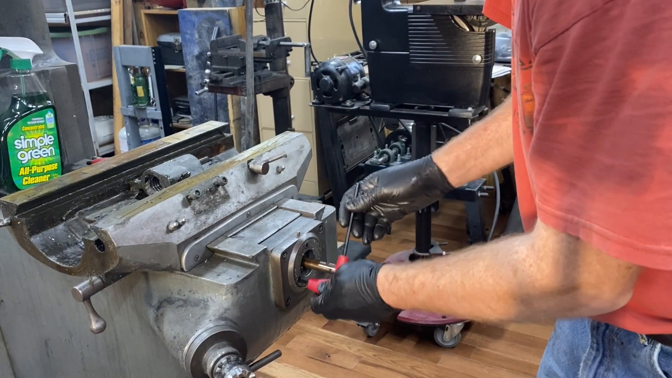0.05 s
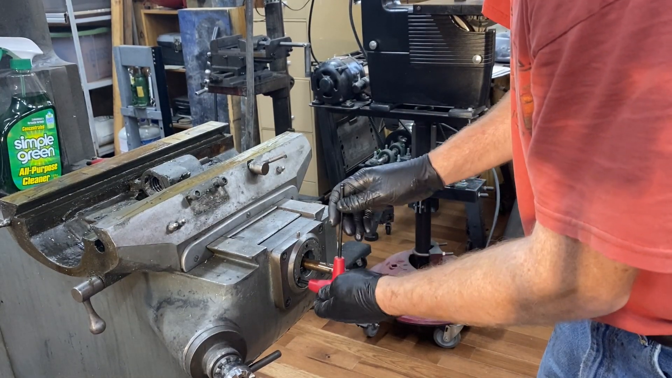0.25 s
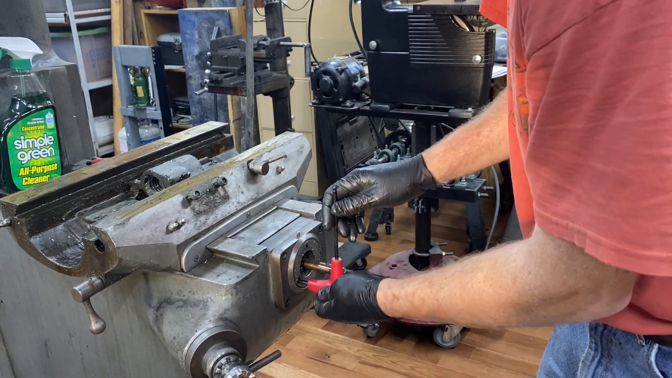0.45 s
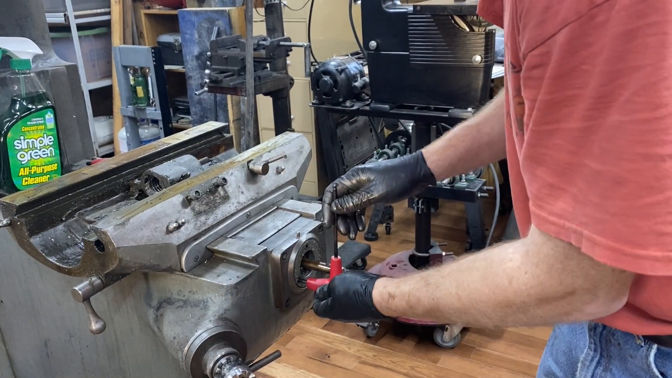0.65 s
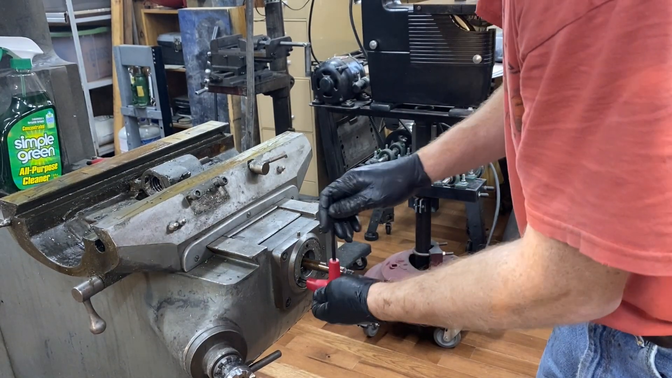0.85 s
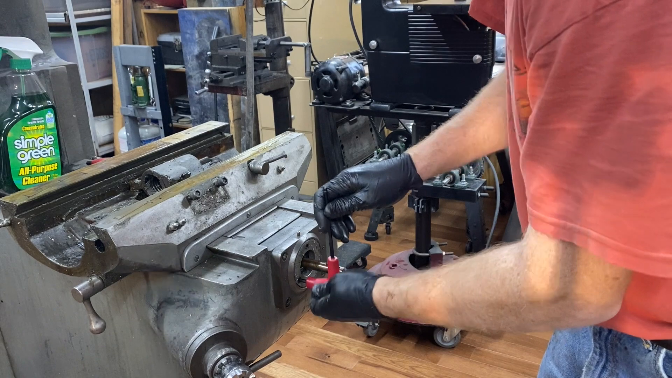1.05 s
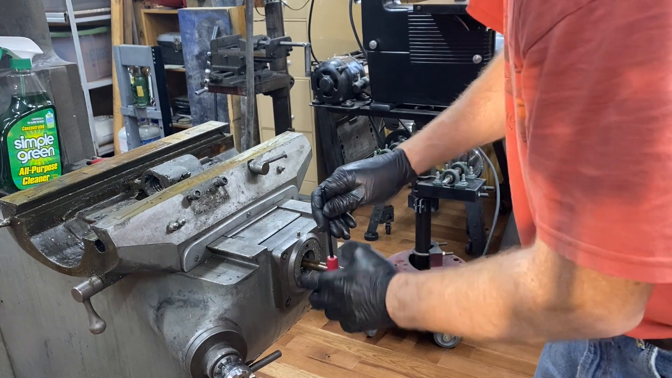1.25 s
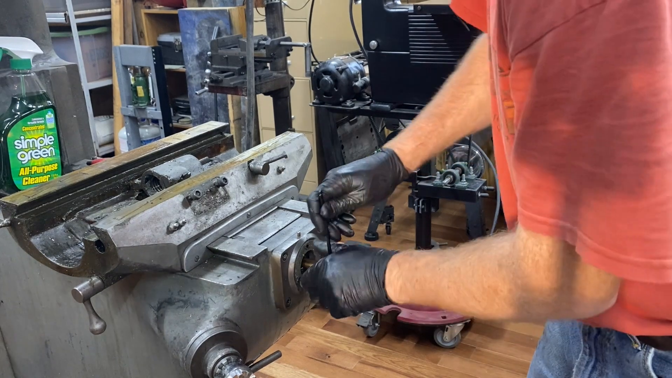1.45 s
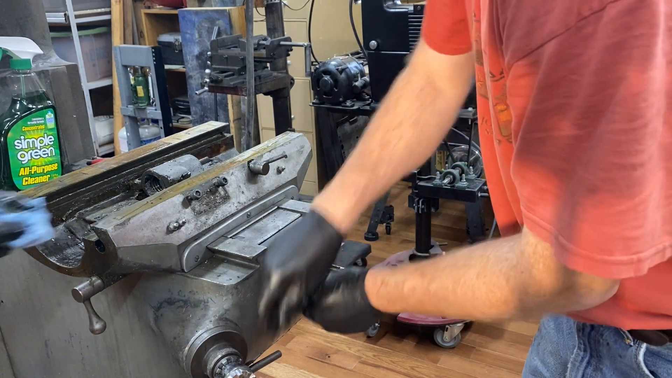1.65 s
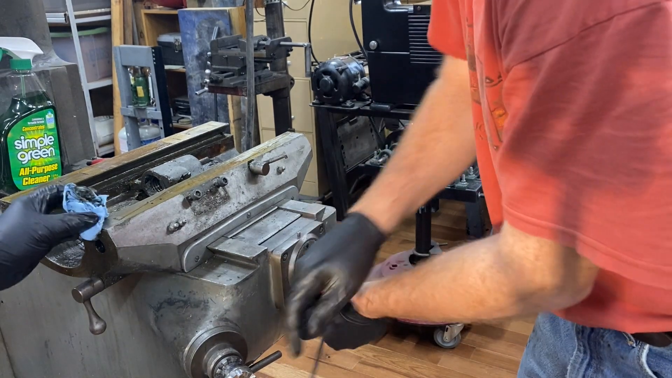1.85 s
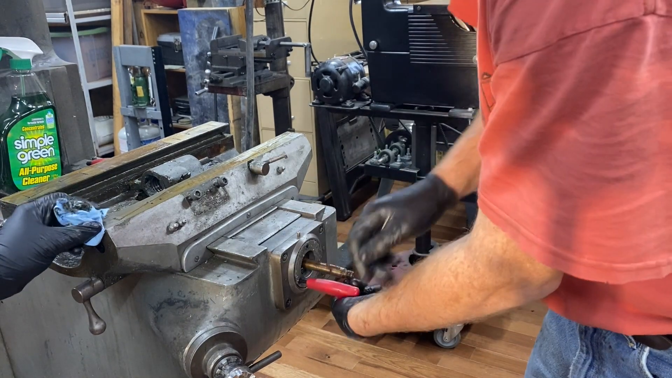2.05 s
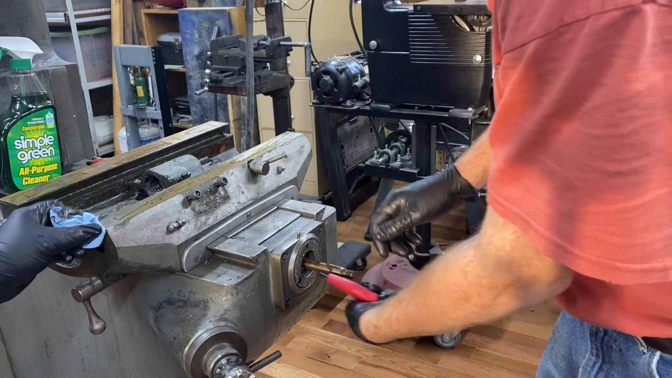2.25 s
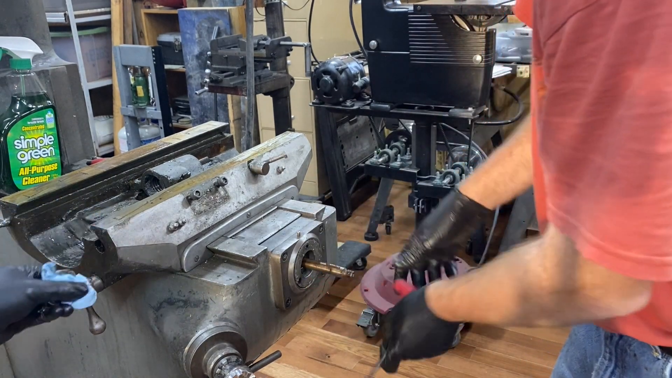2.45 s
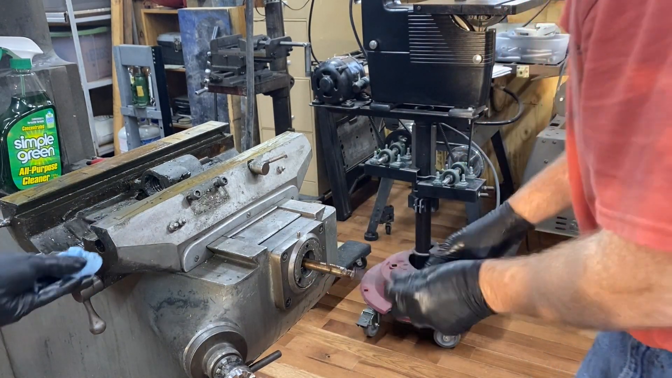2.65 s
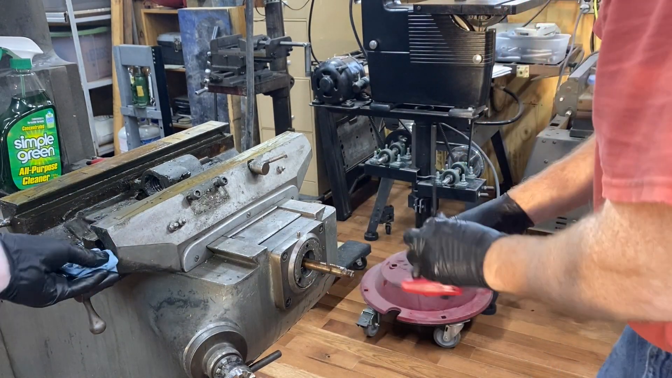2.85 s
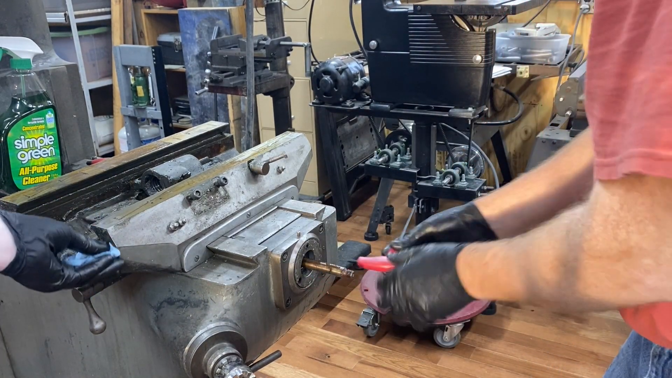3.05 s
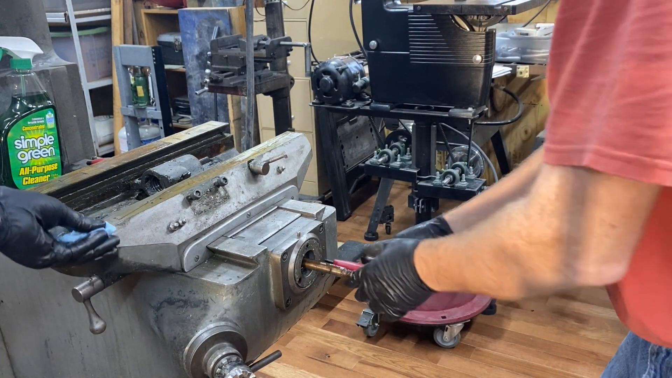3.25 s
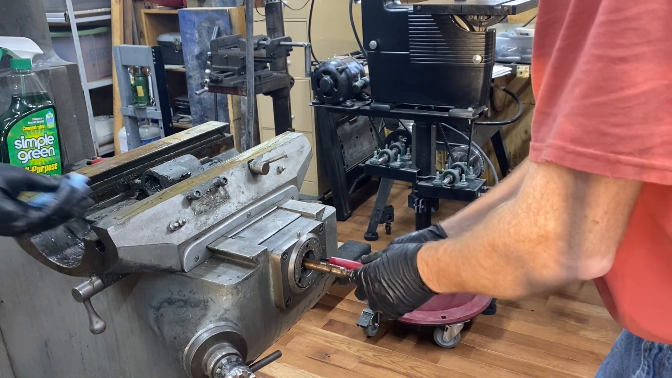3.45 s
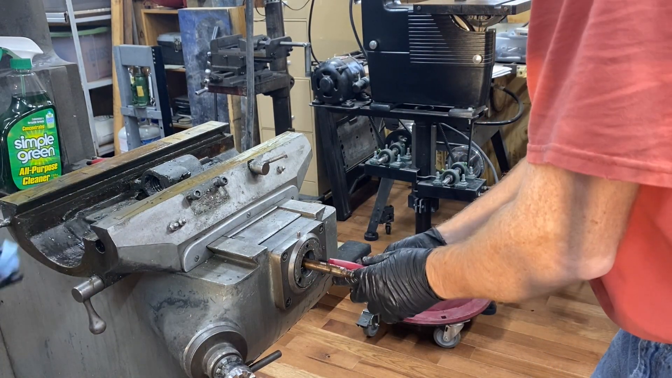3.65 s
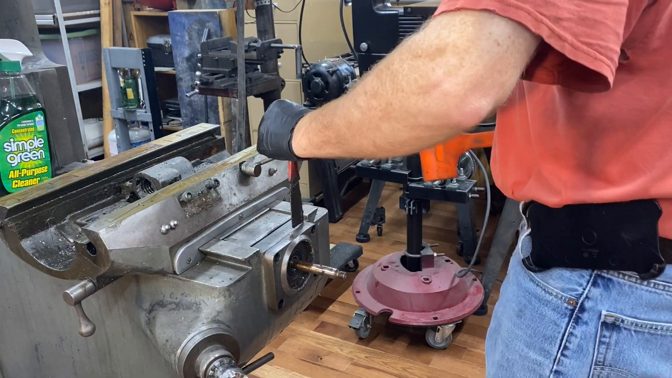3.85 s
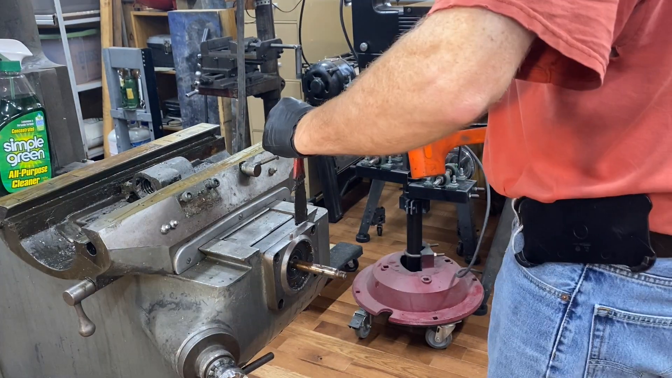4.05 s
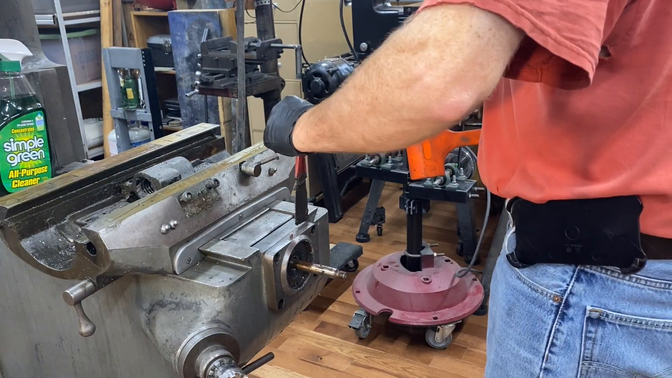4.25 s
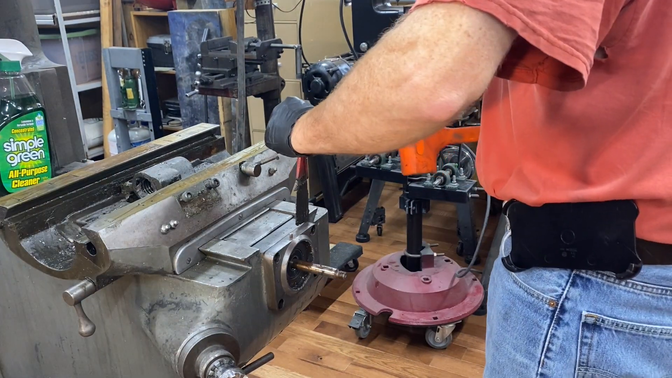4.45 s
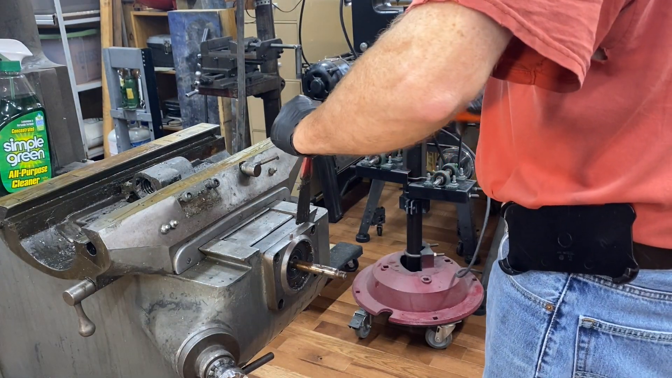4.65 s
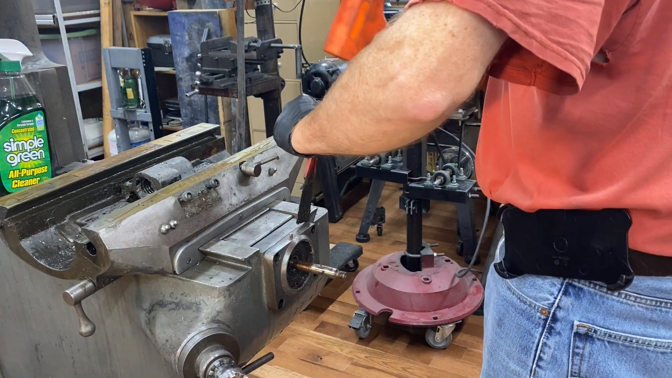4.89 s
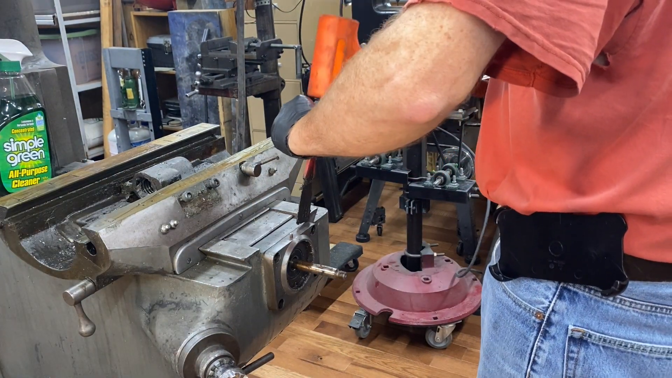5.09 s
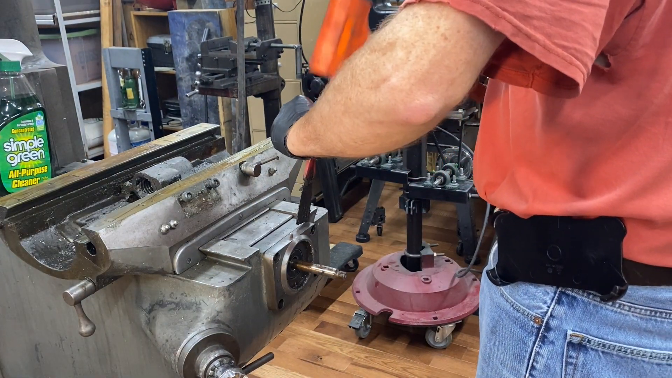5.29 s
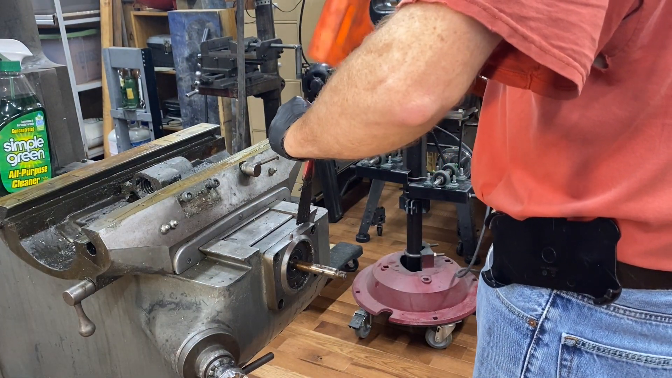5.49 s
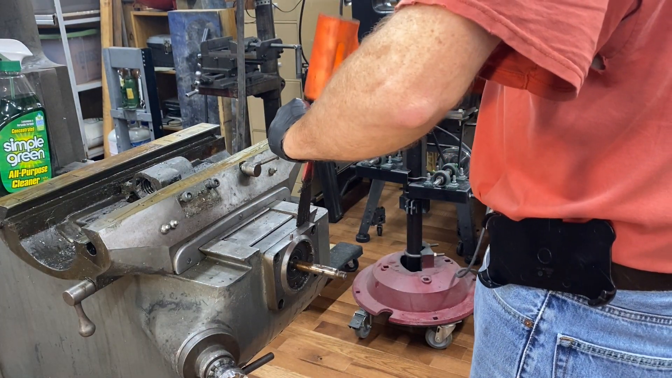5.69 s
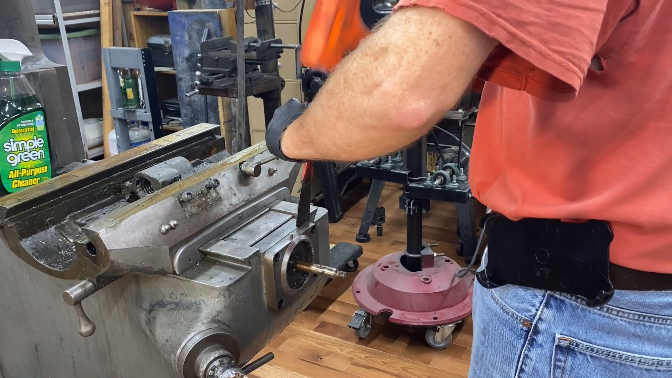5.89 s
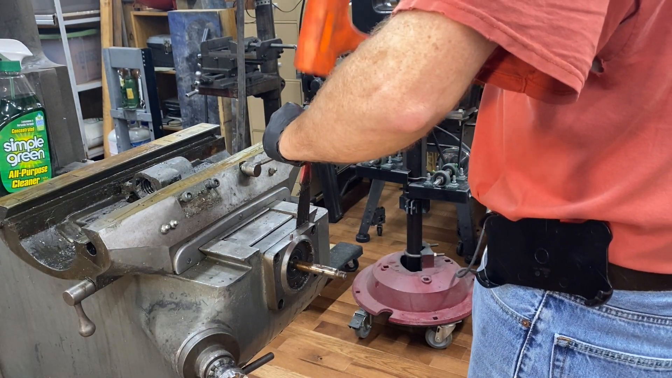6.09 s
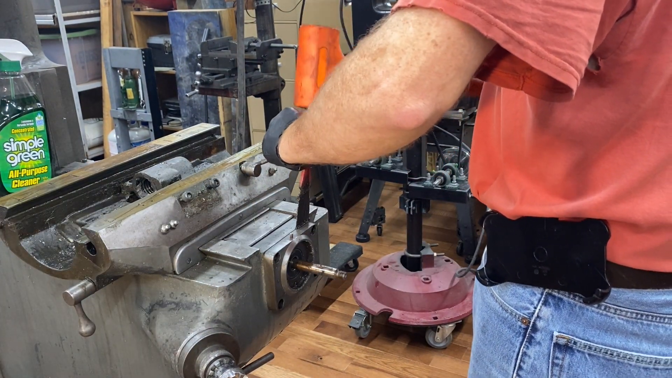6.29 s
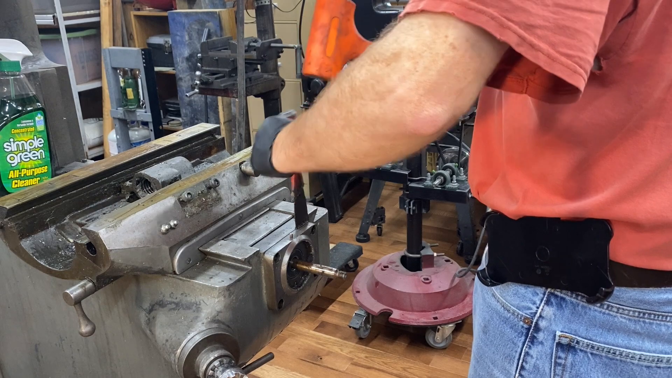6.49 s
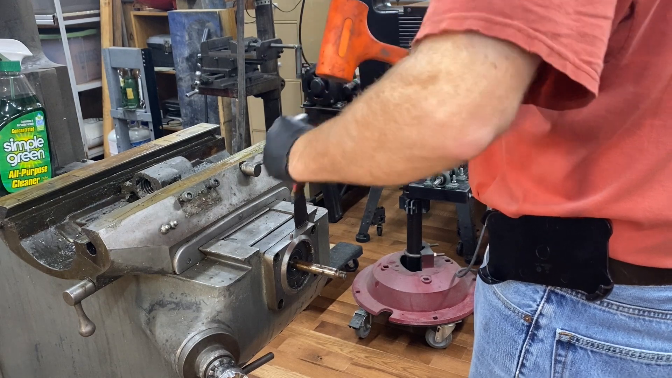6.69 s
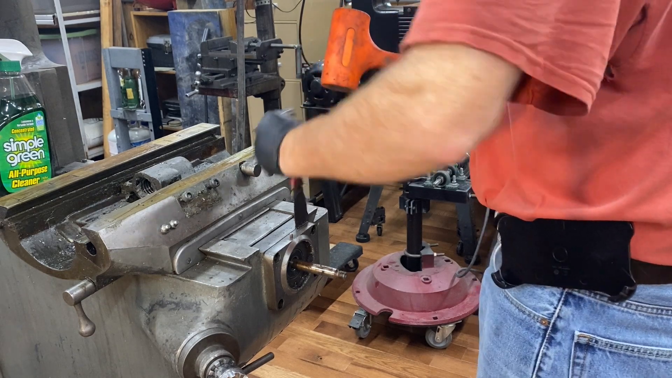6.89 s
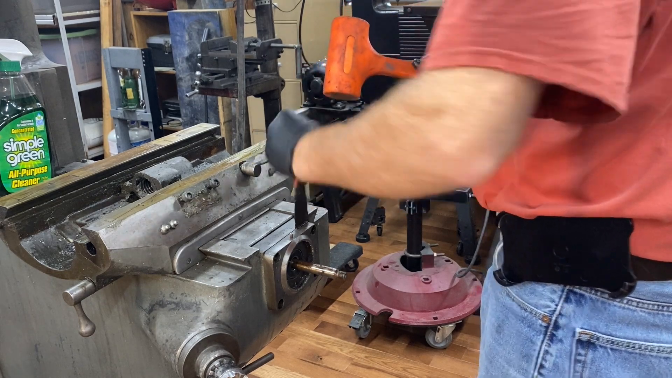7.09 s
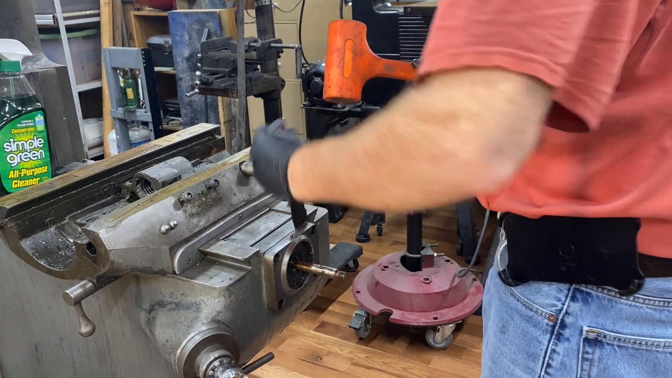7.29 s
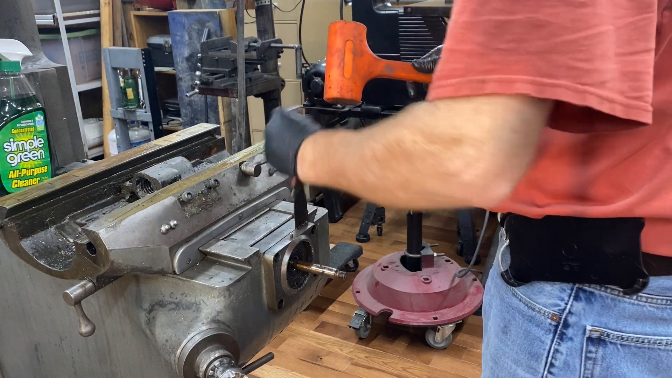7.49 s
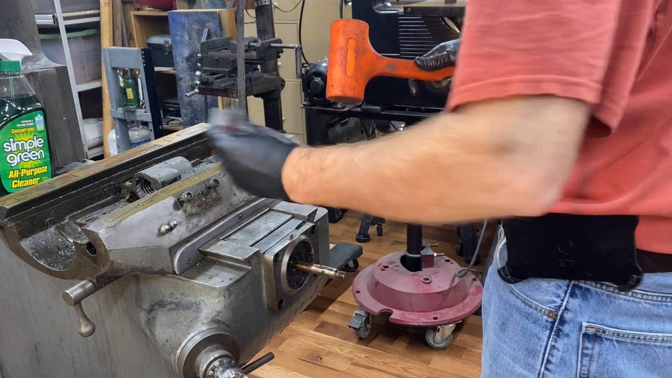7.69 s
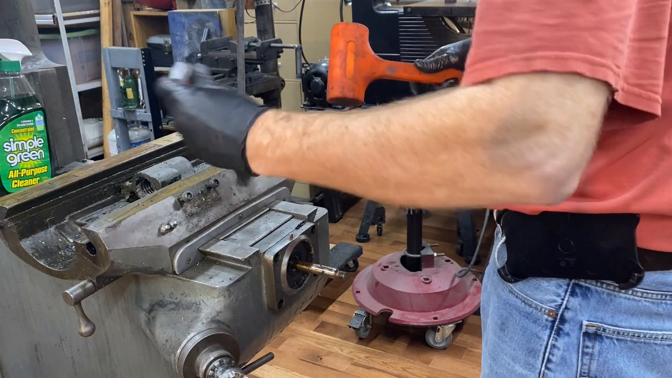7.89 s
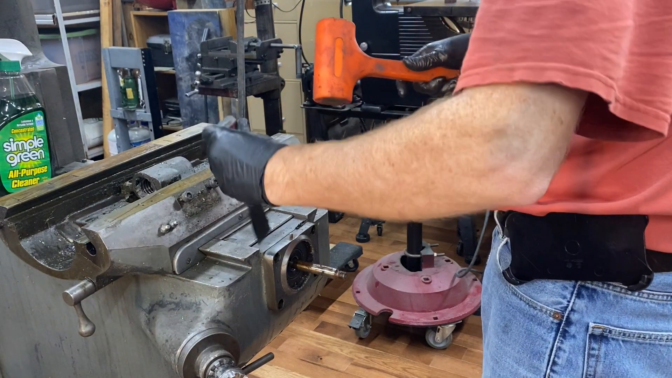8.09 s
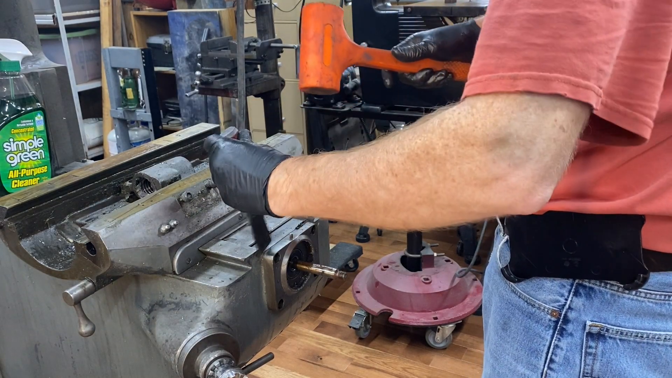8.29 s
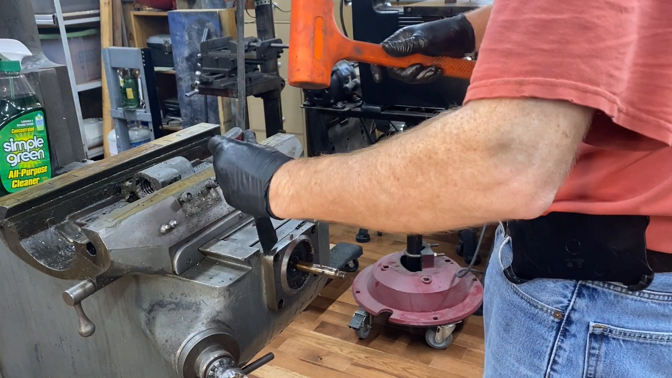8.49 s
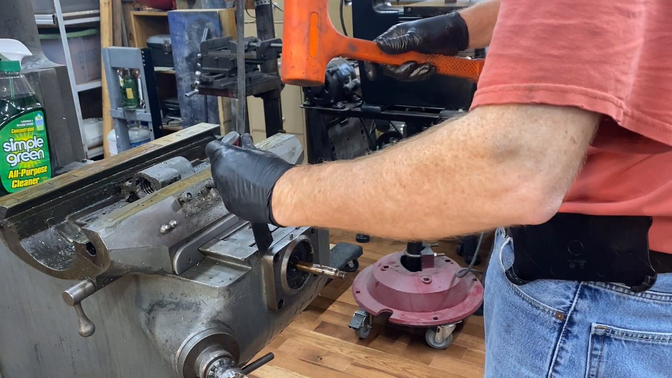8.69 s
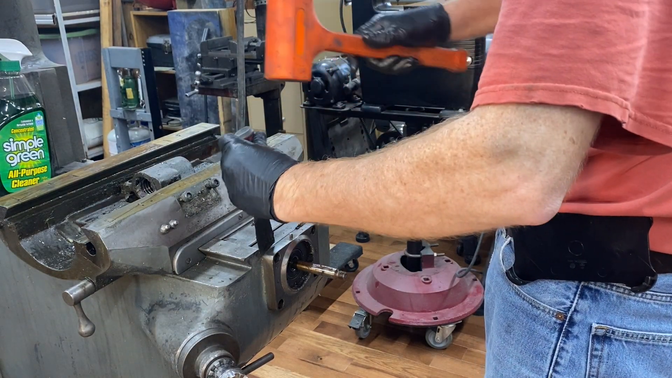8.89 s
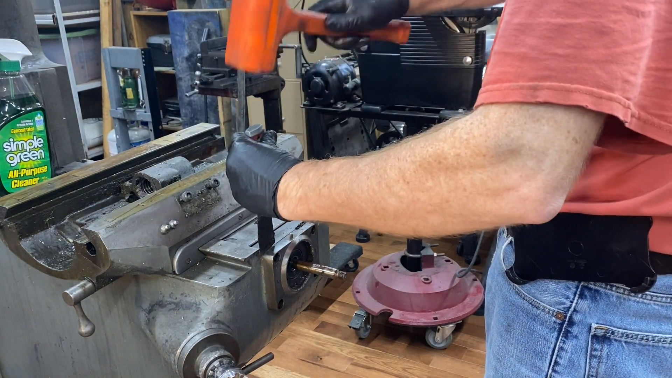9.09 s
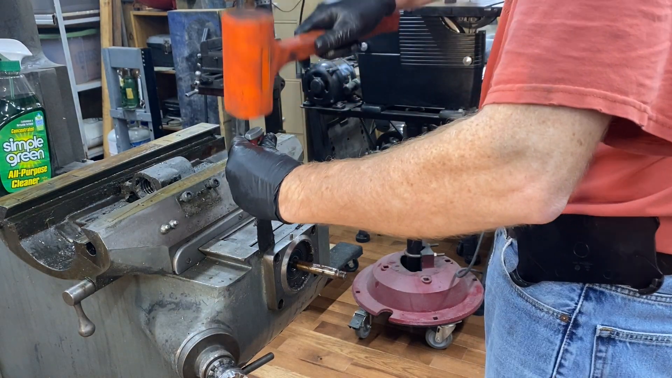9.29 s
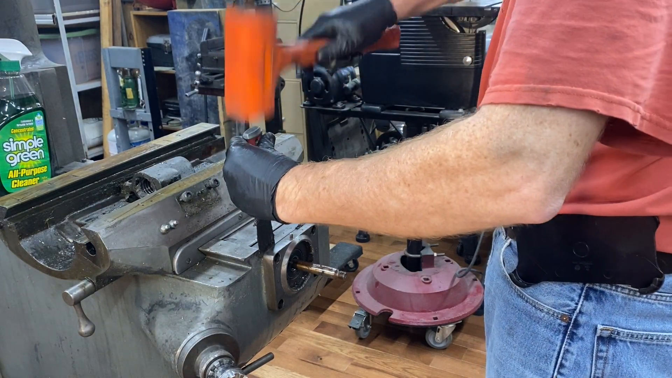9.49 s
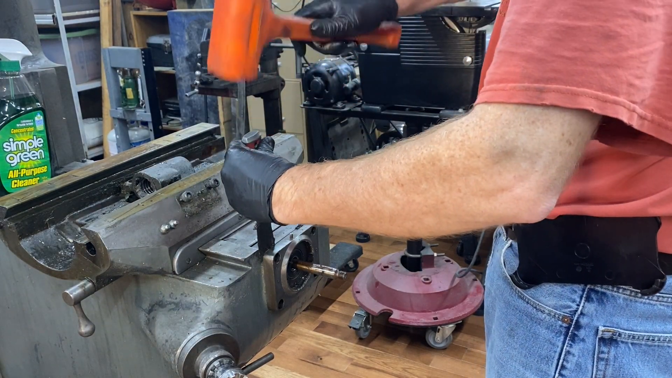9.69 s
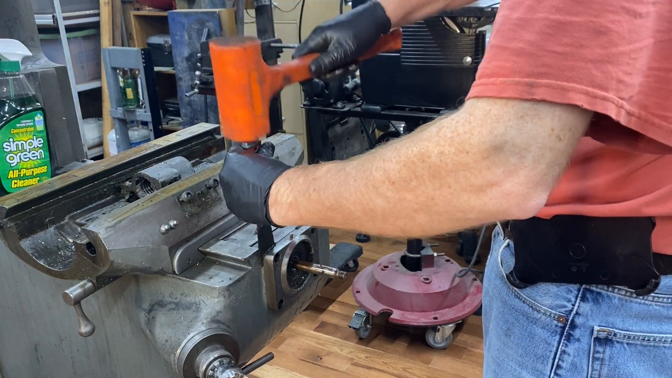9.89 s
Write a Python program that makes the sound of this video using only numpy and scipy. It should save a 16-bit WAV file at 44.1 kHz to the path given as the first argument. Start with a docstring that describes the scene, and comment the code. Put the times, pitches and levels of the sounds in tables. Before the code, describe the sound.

A quiet small workshop, heard close in stereo, with faint low room noise. From 0 to 2 seconds a person moves at a cast-iron machine: low bumps, cloth rubbing, glove hiss, dull floor thuds, short scrapes and small metal clicks around 0.4, 0.6 and 1.7, with a faint low hum near 1. At 2.15 to 2.35 a tool clatters onto a hollow metal stand, ringing briefly. Lighter swishes and clicks follow, with a metallic clink at 3.3. Around 4.1 to 4.4 a steel bar ticks very faintly. Five mallet blows land at 5.05, 5.33, 5.6, 5.9 and 6.2, the first softest, later ones sharper, with iron ring, delayed low thump and a rattly hiss of loose shot. Near quiet, a soft knock at 7.6, tiny clicks at 8.2 to 8.6, then three strong blows at 9.2, 9.5 and 9.8, ending amid a body shift.

```python
"""A small workshop. A person handles a tool at a cast-iron machine and sets it down with a clatter, then
taps a steel bar held on the machine with a dead-blow mallet, five times and three times more.
Hits are filtered noise bursts and dying modes; clothes, gloves and a rag are noise that follows the motion.
Small parts click, scrapes and swishes pass, the floor thuds, a low hum comes and goes, and the cluttered
room answers briefly."""
import sys
import numpy as np
from scipy import signal
from scipy.fft import rfft, irfft, next_fast_len
from scipy.io import wavfile
from scipy.ndimage import uniform_filter1d, map_coordinates

SR = 44100
rng = np.random.default_rng(int(sys.argv[2]) if len(sys.argv) > 2 else 0)


def unload_wav(signal):
    """Save mono or channel-first audio to the path in sys.argv[1] as 16-bit WAV at rate SR, clipped to [-1, 1]."""
    wavfile.write(
        sys.argv[1],
        SR,
        np.round(np.clip(np.atleast_2d(signal).T, -1, 1) * 32767).astype(np.int16),
    )


N = 438354
SIZE = 32768  # samples of one short sound
T, HZ = np.arange(SIZE) / SR, np.fft.rfftfreq(SIZE, 1 / SR)
NOW = np.arange(N) / SR
SIDEWAYS = np.array([[1], [-1]])  # left and right in opposition


def amp(db):
    """Decibels to gain."""
    return 10 ** (np.asarray(db) / 20)


def unit(x):
    """Scales to rms 1."""
    return x / np.sqrt(np.mean(x ** 2) + 1e-20)


def read(points, hz=HZ):
    """Interpolates a table on a log-frequency axis."""
    f, value = np.transpose(points)
    return np.interp(np.log(hz + 1), np.log(f + 1), value)


def add(mix, s, sound):
    """Mixes a sound in at time s."""
    part = mix[..., max(round(s * SR), 0):][..., :sound.shape[-1]]
    part += sound[..., :part.shape[-1]]


def decay(t60_s):
    """Exponential decay by 60 dB in t60_s."""
    return np.exp(-np.log(1000) * T / t60_s)


def colour(x, db):
    """Minimum-phase filter with the given gain: nothing sounds before the hit."""
    cepstrum = irfft(np.log(amp(db)))
    cepstrum[1:SIZE // 2] *= 2
    cepstrum[SIZE // 2 + 1:] = 0
    return irfft(rfft(x) * np.exp(rfft(cepstrum)))


def burst(t60_s, db, smooth_bins=400, rise_s=.00035):
    """A dying jumble of vibrations whose broad spectrum is db."""
    onset = 1 - np.exp(-(T / rise_s) ** 2)
    x = rng.standard_normal(SIZE) * decay(t60_s) * onset
    power = uniform_filter1d(abs(rfft(x)) ** 2, smooth_bins)
    return colour(x, db - 10 * np.log10(abs(power) + 1e-9))


def hardness(low_db, mid_db, top_db):
    """Spectrum of one contact: the harder it is, the more treble."""
    return read([(1000, low_db), (3000, mid_db), (11000, top_db)])


def hump(hz, q):
    """A steep-sided resonance around hz, in dB."""
    detuning = (HZ + 20) / hz - hz / (HZ + 20)
    return np.maximum(-20 * np.log10(1 + (q * detuning) ** 2), -50)


def grains(grain_db):
    """Noise of uneven grain: many tiny impacts or slips, a few of them strong."""
    return rng.standard_normal(SIZE) * amp(grain_db * np.minimum(rng.exponential(1, SIZE), 6))


def ring(modes, rise_s, vary_db=4):
    """Dying modes; each hit lands a little elsewhere and shares its force among them differently."""
    out = np.zeros((2, SIZE))
    for hz, db, t60_s in modes:
        phase = 2 * np.pi * rng.random() + rng.normal(0, 0.37, (2, 1))
        share_db = vary_db * (2 * rng.random() - 1)
        out += amp(db + share_db) * decay(t60_s) * np.sin(2 * np.pi * hz * T + phase)
    return out * (1 - np.exp(-T / rise_s))


def struck(hits, modes, rise_s):
    """One part rings with its own modes at each touch."""
    out = np.zeros(N)
    for s, db in hits:
        add(out, s, amp(db) * ring(modes, rise_s, vary_db=4.5)[0])
    return out


# stereo likeness: (frequency [Hz], left-right correlation [-1..1])
STEREO_LIKENESS = [(60, 0.92), (290, 0.72), (630, 0.05), (1380, 0.05), (3000, 0.36), (14000, 0.16)]


def wide_side(width_db):
    """Gain in dB of the left-right difference of a large radiating body: least in the bass."""
    return width_db + 10 * np.log10(np.clip(1 - read(STEREO_LIKENESS), .01, 1))


def pair(spectrum):
    """Stereo noise of a given spectrum, nearly mono in the bass, rms 1."""
    size = next_fast_len(N)
    hz = np.fft.rfftfreq(size, 1 / SR)
    mid, side = rfft(rng.standard_normal((2, size)))
    same = np.clip(read(STEREO_LIKENESS, hz), -1, 1)
    mid, side = mid * np.sqrt(1 + same), side * np.sqrt(1 - same)
    left_right = np.array([mid + side, mid - side])
    return unit(irfft(left_right * amp(read(spectrum, hz)), size)[:, :N])


def flutter(size):
    """Slow chance of rms 1, smoothed twice over size samples."""
    return unit(uniform_filter1d(uniform_filter1d(rng.standard_normal(N), size), size))


def gesture(start, attack, end, release_db_per_s):
    """Envelope of one movement: it builds up, holds until its end, and dies away."""
    build_up = np.clip((NOW - start) / attack, 0, 1) ** 2
    return build_up * amp(-release_db_per_s * np.maximum(NOW - end, 0))


# spectrum of the still workshop: (frequency [Hz], level [dB])
AIR_SPECTRUM = [(20, -15.5), (45, -1), (80, 0.5), (200, -11.5), (700, -20), (15000, -43)]


def still_air(air_db=-64.5):
    """The still workshop: steady, mostly low noise."""
    return amp(air_db) * pair(AIR_SPECTRUM)


# body sway between shifts, almost still for the first five mallet blows, stirring again for the last three:
# (time [s], low bumping level [dB])
BODY_SWAY = [(0, -34), (1.15, -46), (1.6, -40.5), (2.1, -54), (2.8, -52), (3.3, -62.5), (4.65, -80),
             (8.5, -76.5), (9.1, -49), (9.9, -47)]
# shifts of an arm or weight: (time of maximum [s], build-up [s], low bumping level [dB], cloth rubbing level [dB])
BODY_SHIFTS = [(0.005, 0.21, -27, -35.5), (0.611, 0.28, -35, -36), (1.298, 0.12, -33, -41.5),
               (1.76, 0.2, -36, -50), (4.258, 0.93, -52, -53.5), (8.931, 0.1, -52, -53),
               (9.93, 0.36, -30, -39.5)]
SETTLE_DB_PER_S = 71.5
# strokes of a gloved hand or rag over the machine: (start [s], time until release [s], hiss level [dB])
WIPE_STROKES = [(-0.02, 0.023, -40), (0.174, 1, -58.5), (1.078, 0.3, -56.5), (1.252, 0.54, -51),
                (1.937, 0.099, -53.5), (2.102, 0.83, -56), (2.774, 0.37, -54.5), (3.28, 0.61, -56)]
WIPE_ATTACK_S, WIPE_RELEASE_DB_PER_S = 0.026, 109


def motion(sway_rub_db=-10, sleeve_hiss_db=-10):
    """Gains of bumping, rubbing and hiss: the powers of all movements add, and rubbing cloth hisses a little."""
    bump = amp(np.interp(NOW, *np.transpose(BODY_SWAY)))
    rub = bump * amp(sway_rub_db)
    for s, build, bump_db, rub_db in BODY_SHIFTS:
        shift = gesture(s - build, build, s, SETTLE_DB_PER_S)
        bump = np.hypot(bump, amp(bump_db) * shift)
        rub = np.hypot(rub, amp(rub_db) * shift)
    hiss = rub * amp(sleeve_hiss_db)
    for s, length, db in WIPE_STROKES:
        wipe = gesture(s, WIPE_ATTACK_S, s + length, WIPE_RELEASE_DB_PER_S)
        hiss = np.hypot(hiss, amp(db) * wipe)
    return bump, rub, hiss


def bounced(x, delay_s=0.00075, wander=0.13, bounce_db=-11):
    """The hiss also bounces off the machine by a path that moves with the hand, so it swishes."""
    at = (NOW - delay_s * (1 + wander * flutter(size=9000))) * SR
    reflection = np.array([map_coordinates(side, [at], order=3) for side in x])
    return unit(x + amp(bounce_db) * reflection)


def crackle(per_s, t60_s, spectrum):
    """Sparse little snaps of uneven size, rms 1."""
    snaps = (rng.random(N) < per_s / SR) * amp(4 * np.minimum(rng.exponential(1, N), 3))
    return unit(signal.oaconvolve(snaps, burst(t60_s, read(spectrum)))[:N])


# spectrum of low body bumping: (frequency [Hz], level [dB])
BUMPING_SPECTRUM = [(15, -42.5), (36, -9.5), (50, 7), (66, 6), (90, 0), (150, -2), (260, -21.5), (500, -56)]
# spectrum of rubbing cloth: (frequency [Hz], level [dB])
RUBBING_SPECTRUM = [(70, -11.5), (260, 0.5), (800, -6), (2500, -12.5), (6000, -40)]
# spectrum of hissing gloves and rag: (frequency [Hz], level [dB])
HISSING_SPECTRUM = [(500, -4.5), (1300, -7), (2200, -2), (4000, -5), (6800, -3.5), (8500, -12), (11500, -9),
                    (13800, -7), (15000, -31)]


def handling(bump_db=-1, rub_db=-1, hiss_db=0, rub_rough_db=2, hiss_rough_db=0.5, crinkle_db=-5, tug_db=-7):
    """Low bumping, rubbing cloth and hissing gloves follow the motion; cloth catches and creases snap."""
    bump, rub, hiss = motion()
    out = pair(BUMPING_SPECTRUM) * bump * amp(bump_db)
    out += pair(RUBBING_SPECTRUM) * rub * amp(rub_db + rub_rough_db * flutter(size=500))
    out += bounced(pair(HISSING_SPECTRUM)) * hiss * amp(hiss_db + hiss_rough_db * flutter(size=300))
    creases = crackle(per_s=160, t60_s=0.0016, spectrum=HISSING_SPECTRUM) * hiss * amp(crinkle_db)
    tugs = crackle(per_s=160, t60_s=0.068, spectrum=RUBBING_SPECTRUM) * rub * amp(tug_db)
    return creases + tugs, out


# weight landing on the wooden floor: (time [s], level [dB])
FOOTFALLS = [(0.0, -18), (0.045, -28), (0.585, -23.5), (0.76, -26.5), (1.26, -33), (1.8, -37),
             (2.46, -38.5), (9.88, -39)]
# floor modes: (frequency [Hz], level [dB], t60 [s])
FLOOR_MODES = [(52, 1, 0.4), (67, -3.5, 0.28)]
# low hum: (start [s], time until release [s], level [dB], pitch [Hz])
LOW_HUMS = [(0.8, 0.42, -49.5, 124.6), (2.054, 0.73, -56, 70)]


def floorboards(waver_db=3.0):
    """The wooden floor thuds under shifting feet, and a low hum comes and goes."""
    out = struck(FOOTFALLS, FLOOR_MODES, rise_s=0.02)
    for s, length, db, hz in LOW_HUMS:
        envelope = gesture(s, WIPE_ATTACK_S, s + length, SETTLE_DB_PER_S)
        level = amp(db + waver_db * flutter(size=2000))
        tone = unit(np.sin(2 * np.pi * hz * NOW + flutter(size=3000)))
        out += envelope * level * tone
    return out


# soft bumps of hands and arms: (time [s], level [dB], pitch [Hz])
SOFT_BUMPS = [(0.005, 10, 1650), (0.021, 18.5, 230), (0.44, 11.5, 257), (0.519, 12.5, 265), (0.694, 4, 490),
              (1.247, 9.5, 257), (1.274, 18, 161), (1.727, -0.5, 320), (1.275, 4.5, 760), (4.734, -16, 700),
              (7.645, 1, 320), (8.72, -5, 200), (8.910, 1.5, 230), (9.06, -3.5, 260.7)]


def bumps(t60_s=0.24, q=1.1, rise_s=0.004):
    """A padded contact swells gently and wakes only one dull resonance."""
    out = np.zeros(N)
    for s, db, hz in SOFT_BUMPS:
        add(out, s, burst(t60_s, hump(hz, q) + db, smooth_bins=100, rise_s=rise_s))
    return out


# scrapes, swishes, squeaks and faint glove rustles:
# (middle [s], length [s], level [dB], resonance [Hz], sharpness [Q])
SCRAPES_AND_RUSTLES = [(0.37, 0.12, -42, 1600, 0.44), (0.873, 0.039, -44.5, 2900, 0.97),
                       (1.363, 0.2, -48, 5200, 1.1), (2.845, 0.13, -47, 4940, 1),
                       (3.099, 0.15, -50, 1900, 1.0), (3.719, 0.077, -53, 1330, 0.58),
                       (3.839, 0.053, -49.5, 1540, 4.2), (6.934, 0.11, -71.5, 2050, 0.65),
                       (7.067, 0.12, -69, 3000, 0.23), (8.574, 0.042, -49.5, 3466, 0.14)]


def scrapes_and_rustles(grain_db=2.5):
    """Dense tiny slips drive one resonance, louder toward the middle of each stroke."""
    out = np.zeros(N)
    for s, length, db, hz, q in SCRAPES_AND_RUSTLES:
        slips = unit(colour(grains(grain_db), hump(hz, q)))
        stroke = np.sin(np.pi * np.minimum(T / length, 1))
        add(out, s - length / 2, amp(db) * stroke * slips)
    return out


# small metal contacts: (time [s], tick level [dB], treble tilt by hardness [dB/octave],
# ring level [dB], ring pitch [Hz], ring sharpness [Q])
METAL_CLICKS = [(0.414, -3.5, -3, -15, 1580, 1.3), (0.4218, 1.5, -10.5, 8.5, 1510, 1.36),
                (0.588, 5.5, 1.5, 3, 1740, 0.64), (1.0962, -24, 8, -8.5, 1590, 0.26),
                (1.7253, -11.5, -21, 14.5, 472, 1.26), (2.8, -11, -1.5, 3, 2560, 2.7),
                (3.2748, 3, -1, 10, 1940, 1.1), (7.637, -20.5, 4.5, -4.5, 891, 0.75),
                (8.154, -18, 5, -28, 899, 1.1), (8.187, -12, -21, -6, 960, 0.68),
                (8.29, -3.5, -6, -13.5, 1000, 0.29), (8.4906, -10.5, -35, -4, 914, 2),
                (8.577, -10.5, -21, -23, 1100, 0.74)]
# spectrum of a tick: (frequency [Hz], level [dB])
CLICK_SPECTRUM = [(100, -23.5), (450, -1), (900, 2), (6000, -1.5), (12000, -7), (16000, -18.5)]


def clicks(tick_t60_s=0.011, ring_t60_s=0.17, treble_hz=3000, thin_q=1, thin_db=-9):
    """Steel touches steel: a tick, weaker below the part's own pitch, and the short ring of the part."""
    out = np.zeros(N)
    octaves = np.log2(np.maximum(HZ / treble_hz, 1))
    for s, tick_db, tilt_db, ring_db, hz, q in METAL_CLICKS:
        below_db = np.where(HZ < hz, np.maximum(hump(hz, thin_q), thin_db), 0)
        tick_spectrum_db = read(CLICK_SPECTRUM) + tick_db + tilt_db * octaves + below_db
        add(out, s, burst(tick_t60_s, tick_spectrum_db))
        add(out, s, burst(ring_t60_s, hump(hz, q) + ring_db, smooth_bins=100))
    return out


# tool contacts: (time [s], level at 1 kHz [dB], at 3 kHz [dB], at 11 kHz [dB], clack t60 [s], stand ring level [dB])
TOOL_CLACKS = [(2.1512, -20, -7.5, -18.5, 0.02, -33.5), (2.1713, 17, 18.5, 1.5, 0.028, -3.5),
               (2.2832, 10, 11.5, -12, 0.05, -2), (2.3272, 14, 14, 16, 0.011, -4)]
# spectrum of a clack: (frequency [Hz], level [dB])
CLACK_SPECTRUM = [(100, -13), (450, -8.5), (900, 1.5), (2200, -4.5), (3000, 3.5), (4300, -7.5), (5500, -3),
                  (6850, 6.5), (7700, -3), (11500, 2), (16000, -19)]
# hollow ring of the stand: (frequency [Hz], level [dB])
STAND_SPECTRUM = [(80, -2.5), (450, -3.5), (720, 23.5), (950, 27.5), (1150, 26.5), (1500, 6.5), (2400, 11),
                  (3300, -1.5), (6600, -8), (8500, -19), (15000, -14.5)]
# lasting modes of the stand: (frequency [Hz], level [dB], t60 [s])
STAND_RING_MODES = [(630, -9.5, .35), (703, -4, 0.32), (803, 6, .42), (858, 0.5, 0.5), (912, -0.5, .5),
                    (1108, 0.5, .4), (1245, -3.5, 0.32), (3228, -10, 0.26), (3396, -8, .5)]


def set_down(ring_t60_s=0.22, modes_db=-27, width_db=-6):
    """The tool lands, tips over and settles on a hollow metal stand."""
    near, wide = np.zeros(N), np.zeros((2, N))
    for s, low_db, mid_db, top_db, clack_t60_s, ring_db in TOOL_CLACKS:
        hollow_db = read(STAND_SPECTRUM) + ring_db
        add(near, s, burst(clack_t60_s, read(CLACK_SPECTRUM) + hardness(low_db, mid_db, top_db)))
        add(near, s, burst(ring_t60_s, hollow_db, smooth_bins=100))
        add(wide, s, SIDEWAYS * burst(ring_t60_s, hollow_db + wide_side(width_db), smooth_bins=100))
        add(wide, s, amp(ring_db + modes_db) * ring(STAND_RING_MODES, rise_s=0.0035))
    return near, wide


# hand tool on the brass shaft: (time [s], level [dB])
SHAFT_CLINKS = [(3.2746, -26)]
# shaft modes: (frequency [Hz], level [dB], t60 [s])
SHAFT_MODES = [(1507, 3, 0.13), (1655, -3.5, 0.15), (2700, -5.5, 0.11), (2890, -3, 0.1), (5670, 8, 0.014)]


def shaft_clinks():
    """The hand tool excites the modes of the brass shaft."""
    return struck(SHAFT_CLINKS, SHAFT_MODES, rise_s=0.0009)


# tip of the bar feeling for its place: (time [s], level [dB])
BAR_TICKS = [(4.0625, -32.5), (4.1508, -33.5), (4.274, -35), (4.3065, -39), (4.4242, -40)]
# bar modes, damped by the hand: (frequency [Hz], level [dB], t60 [s])
BAR_MODES = [(990, -6, 0.021), (1574, -3.5, 0.0083), (2460, 1, 0.0097), (3710, -1.5, 0.0038),
             (5510, -3, 0.0032)]


def bar_ticks():
    """The tip of the hand-damped bar ticks: its modes die within milliseconds."""
    return struck(BAR_TICKS, BAR_MODES, rise_s=0.000093)


# bar settling on its seat: (time [s], level [dB])
BAR_SEATINGS = [(4.3106, -35.5), (4.426, -39), (8.492, -45), (8.575, -48)]
# seat modes: (frequency [Hz], level [dB], t60 [s])
SEAT_MODES = [(726, 0.5, 0.058), (789, -4.5, 0.08), (1000, 0, 0.035)]


def seat_hums():
    """The bar settles on its seat, whose modes hum briefly."""
    return struck(BAR_SEATINGS, SEAT_MODES, rise_s=0.0011)


# mallet blows: (time [s], crack level at 1 kHz [dB], at 3 kHz [dB], at 11 kHz [dB], crack t60 [s],
# iron ring level [dB], neighbouring part level [dB], thump level [dB], thump lag [s],
# shot landing level [dB], shot sliding level on the downswing [dB])
MALLET_BLOWS = [(5.0467, -5, 7.6, -27, 0.0076, -8.5, -34.5, -1.5, 0.013, -35.5, -79.5),
                (5.3332, 7.5, 12.8, -12, 0.014, -5.5, -26, 0, 0.012, -22, -55.5),
                (5.6081, 15.5, 20.5, -1.5, 0.018, 1.5, -30, -2.5, 0.006, -7.5, -54.5),
                (5.9286, 16.5, 15.4, -2, 0.011, -14.5, -48, -5, 0.031, -7.5, -50.5),
                (6.2314, 17.5, 17.4, 1.5, 0.007, -16, -50, -9, 0.011, -3, -48),
                (9.1760, 22.5, 18.3, -0.5, 0.034, -1.5, -39, 0.5, 0.0092, -15, -59.5),
                (9.5073, 18.5, 12.7, 6, 0.019, -13.5, -48, -5.5, 0.02, -3.5, -41.5),
                (9.8230, 20, 14, 6.5, 0.021, -13.5, -58, -3, 0.014, -4, -38)]
# spectrum of the crack: (frequency [Hz], level [dB])
CRACK_SPECTRUM = [(80, -11.5), (330, -31.5), (600, -9), (900, 0.5), (1900, -6.5), (2500, 0.5), (2950, 1),
                  (3250, -3), (3650, 3), (4250, 3.5), (5000, -4), (7000, -1), (11500, 4), (14000, -12),
                  (16000, -12.5)]
# crowded short modes of the casting: (frequency [Hz], level [dB])
CASTING_SPECTRUM = [(40, 4.5), (200, 12.5), (400, 24.5), (540, 21.5), (720, 30), (900, 25), (1150, 24),
                    (1650, 22.5), (2600, 11.5), (4100, 4.5), (5500, -8.5), (15000, -13.5)]
# lasting modes of the casting: (frequency [Hz], level [dB], t60 [s])
CASTING_MODES = [(296.7, -7.5, .3), (314.4, -8, 0.39), (556, -10.5, 0.27), (698, -1, 0.44), (804, -9, 0.26),
                 (832, -3.5, 0.32), (846, -6.5, 0.27), (915, -2.5, 0.47), (1180, -14, 0.31),
                 (1230, -15, .38), (1512, -8.5, 0.49), (1610, -6, 0.17), (1925, -6, .27),
                 (2474, -8.5, 0.16)]
# neighbouring part that sings along under some blows: (frequency [Hz], level [dB], t60 [s])
NEIGHBOUR_MODES = [(887, -4, 0.4)]
# spectrum of the loose shot inside the mallet head: (frequency [Hz], level [dB])
SHOT_SPECTRUM = [(400, -32), (1300, 0.5), (2500, 4.5), (5000, 4.5), (8000, 2.5), (14000, 6.5),
                 (16000, -26.5)]
SWING_LEAD_S, SWING_SLIDE_S = 0.075, 0.09  # start of the shot's slide before the blow, and its length


def mallet(crack_rise_s=0.00099, scatter_t60_s=0.013, clang_t60_s=0.25, clang_db=-4, width_db=-4,
           modes_db=-23, thump_hz=126, thump_db=-25, swell_s=0.021, boom_t60_s=0.48, boom_db=26, boom_q=1.8,
           shot_lag_s=0.016, shot_grain_db=3):
    """The plastic face cracks on the bar, the casting rings; a moment later the whole machine thumps."""
    crack, scattered, body, wide = np.zeros(N), np.zeros(N), np.zeros(N), np.zeros((2, N))
    for (s, low_db, mid_db, top_db, crack_t60_s, ring_db, neighbour_db,
         weight_db, lag_s, shot_db, slide_db) in MALLET_BLOWS:
        # the room receives the crack from all sides of the machine, so its share is denser and more even
        face_db = read(CRACK_SPECTRUM) + hardness(low_db, mid_db, top_db)
        add(crack, s, burst(crack_t60_s, face_db, rise_s=crack_rise_s))
        add(scattered, s, burst(scatter_t60_s, face_db, smooth_bins=70))
        casting_db = read(CASTING_SPECTRUM) + ring_db + clang_db
        add(body, s + .001, burst(clang_t60_s, casting_db, smooth_bins=110))
        add(wide, s + .001, SIDEWAYS * burst(clang_t60_s, casting_db + wide_side(width_db), smooth_bins=110))
        add(wide, s, amp(ring_db + modes_db) * ring(CASTING_MODES, rise_s=0.003))
        add(wide, s, amp(neighbour_db) * ring(NEIGHBOUR_MODES, rise_s=0.0044, vary_db=0))
        # the heavy base takes a few cycles to get moving, then the floor booms on
        push = (T / swell_s * np.exp(1 - T / swell_s)) ** 2
        add(wide, s + lag_s, amp(weight_db + thump_db) * push * np.sin(2 * np.pi * thump_hz * T))
        floor_db = hump(thump_hz, boom_q) + weight_db + boom_db
        add(wide, s + lag_s, burst(boom_t60_s, floor_db, smooth_bins=40, rise_s=swell_s))
        # the shot slides back on the downswing and piles in just after the face lands
        stroke = np.sin(np.pi * np.minimum(T / SWING_SLIDE_S, 1)) ** 2
        slide = unit(colour(grains(shot_grain_db), read(SHOT_SPECTRUM))) * stroke
        add(body, s - SWING_LEAD_S, amp(slide_db) * slide)
        add(body, s + shot_lag_s, burst(0.019, read(SHOT_SPECTRUM) + shot_db, rise_s=0.015))
    return crack + body, scattered + body, wide


# bar on the top of the machine, when lifted and when first struck there: (time [s], level [dB])
TOP_KNOCKS = [(7.637, -41), (9.179, -24)]
# machine top modes: (frequency [Hz], level [dB], t60 [s])
TOP_MODES = [(290.8, -2.5, 0.23), (1247, 3, 0.059), (1430, -3.5, 0.06), (3120, 3.5, 0.0079),
             (6660, 13, 0.0059)]


def top_knocks():
    """The bar knocks against the top of the machine and excites its modes."""
    return struck(TOP_KNOCKS, TOP_MODES, rise_s=0.000565)


# reverberation: (frequency [Hz], t60 [s])
ROOM_T60 = [(100, 0.57), (260, 0.63), (700, 0.62), (1800, 0.53), (4800, 0.5), (12800, 0.2)]


def tail(rise_s=0.00026):
    """A dense echo from shelves and walls, each band dying at its own speed."""
    white = pair([(20, 0), (20000, 0)])[:, :SIZE]
    hz, t, z = signal.stft(white, SR, nperseg=256)
    band_decay = np.exp(-np.log(1000) * t / read(ROOM_T60, hz)[:, None])
    echo = signal.istft(z * band_decay, SR, nperseg=256)[1][:, :SIZE]
    echo = echo * (1 - np.exp(-T / rise_s))
    return echo / np.linalg.norm(echo[0])


def room(x, turn_hz=.7):
    """The moving body keeps changing the echo paths: two tails take turns."""
    turn = 2 * np.pi * turn_hz * NOW
    shares = np.cos(turn), np.sin(turn)
    return sum(signal.oaconvolve((x * share)[None], tail(), axes=1)[:, :N] for share in shares)


# lag of the left port behind the right: (frequency [Hz], phase [rad])
PORT_PHASE_LAG = [(100, 0), (1500, .1), (3400, .5), (6700, 1.2), (9600, 3.3), (15000, 6.8)]
# port balance: (frequency [Hz], left minus right [dB])
PORT_LEVEL_BALANCE = [(1300, 1.5), (2300, -1.2), (4300, -4), (7500, 1)]


def ports(x):
    """Direct sound reaches the two microphone ports slightly out of step and unevenly loud."""
    size = next_fast_len(N + SIZE)
    hz = np.fft.rfftfreq(size, 1 / SR)
    lag = np.exp(-.5j * SIDEWAYS * read(PORT_PHASE_LAG, hz))
    balance = amp(.5 * SIDEWAYS * read(PORT_LEVEL_BALANCE, hz))
    return irfft(rfft(x, size) * lag * balance, size)[:, :N]


def scene():
    """All sources, each with its share of the room."""
    creases, rustle = handling()
    floor = floorboards()
    small = bumps() + scrapes_and_rustles() + clicks() + creases
    clacks, stand = set_down()
    rings = shaft_clinks() + seat_hums() + top_knocks()
    ticks = bar_ticks()
    blows, scattered, iron = mallet()
    direct = ports(blows + amp(-0.5) * clacks + small + rings + ticks)
    to_room = amp(-5.5) * scattered + amp(-3.5) * clacks + amp(-4.5) * small + amp(-4.0) * rings
    to_room += amp(-13) * ticks  # the hand and body shield the tip of the bar from the room
    return direct + room(to_room) + iron + stand + rustle + floor + still_air()


# overall tone colour, with a narrow dip near 9 kHz: (frequency [Hz], gain [dB])
TONE_COLOUR = [(20, -2), (7200, -2), (8300, -6.5), (9300, -23), (10600, -2), (14000, -7), (15000, -14)]


def record(dry, edge_hz=15100):
    """Overall tone colour with a narrow dip near 9 kHz, full-scale ceiling and band limit."""
    pulse = colour(signal.unit_impulse(SIZE), read(TONE_COLOUR))[:SIZE // 32]
    heard = np.clip(signal.oaconvolve(dry, pulse[None], axes=1)[:, :N], -1, 1)
    low_pass = signal.firwin(255, edge_hz, window=("kaiser", 9), fs=SR)
    return signal.oaconvolve(heard, low_pass[None], "same")


dry = scene()
out = record(dry)
unload_wav(out)
```